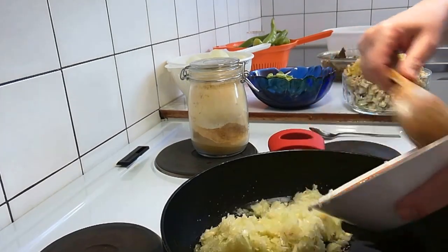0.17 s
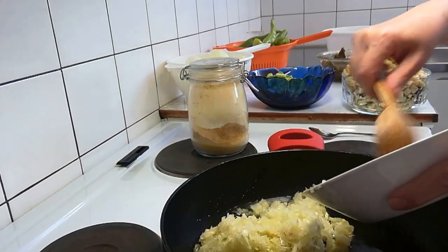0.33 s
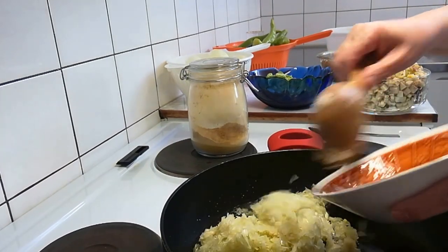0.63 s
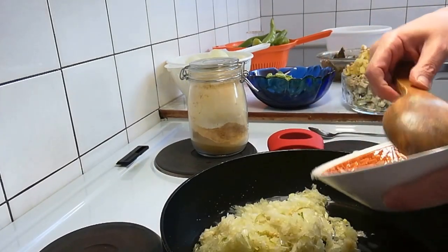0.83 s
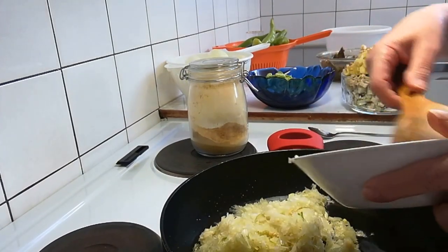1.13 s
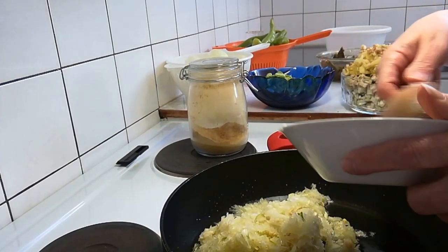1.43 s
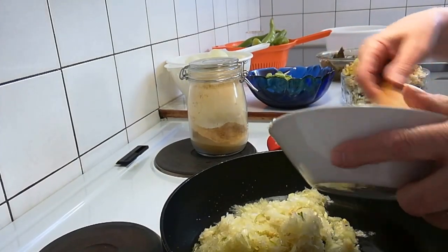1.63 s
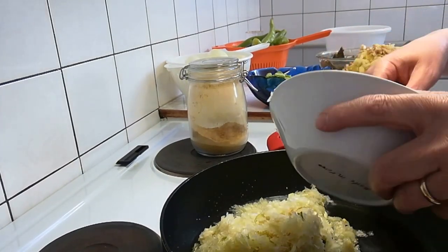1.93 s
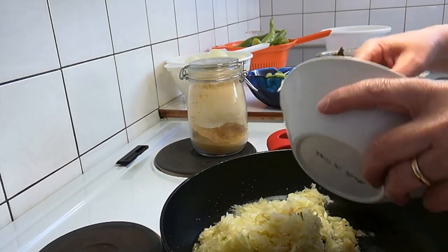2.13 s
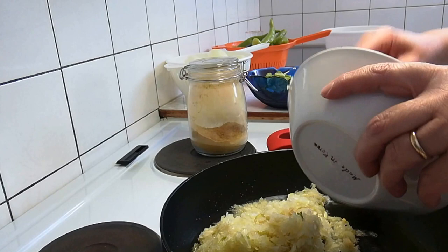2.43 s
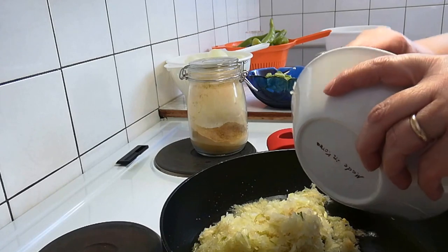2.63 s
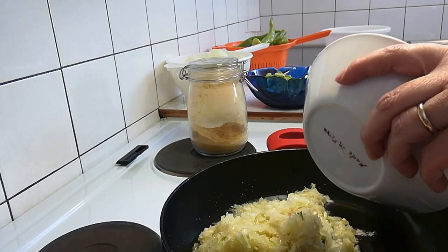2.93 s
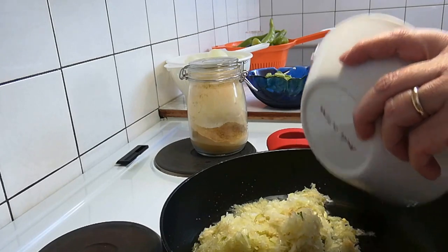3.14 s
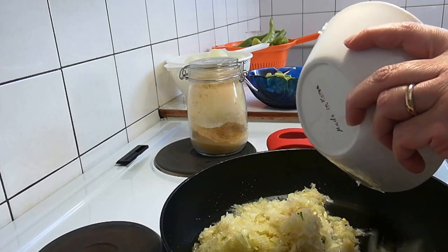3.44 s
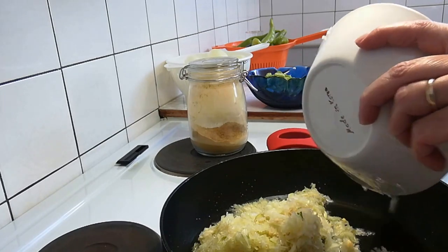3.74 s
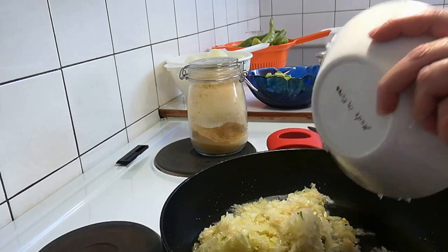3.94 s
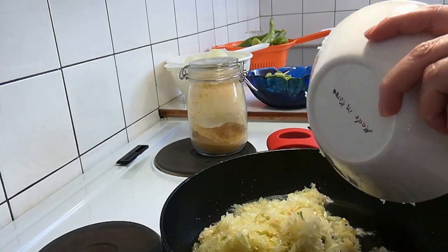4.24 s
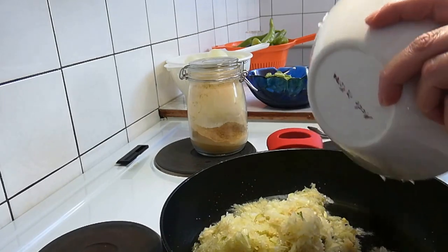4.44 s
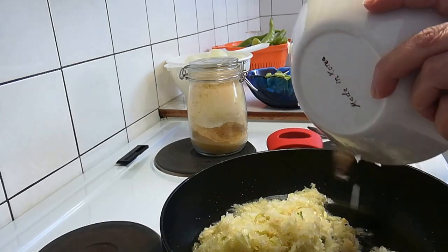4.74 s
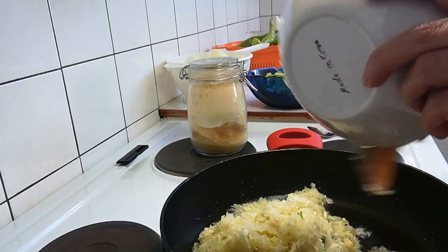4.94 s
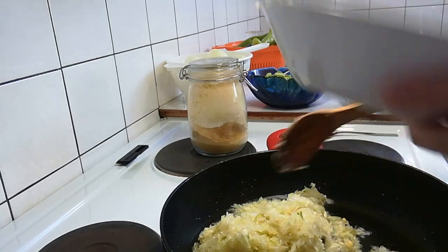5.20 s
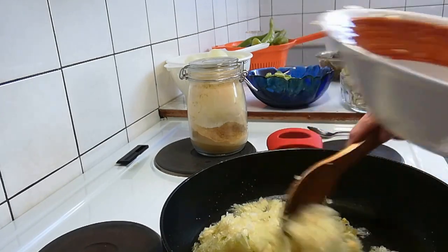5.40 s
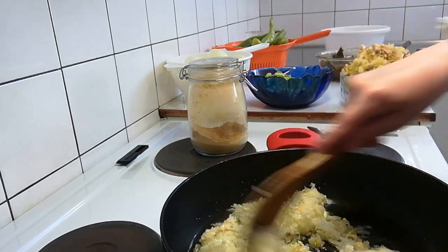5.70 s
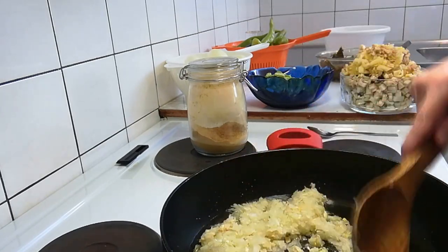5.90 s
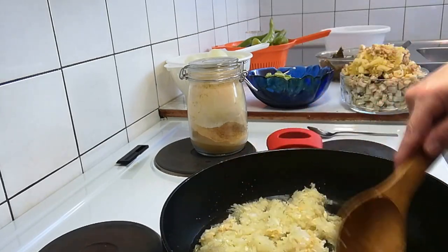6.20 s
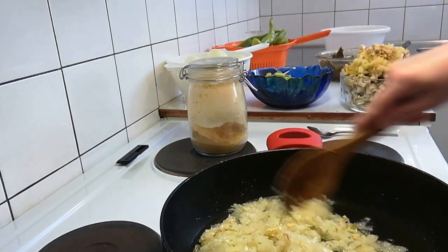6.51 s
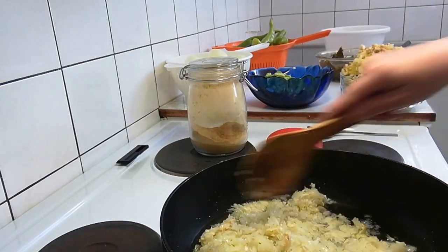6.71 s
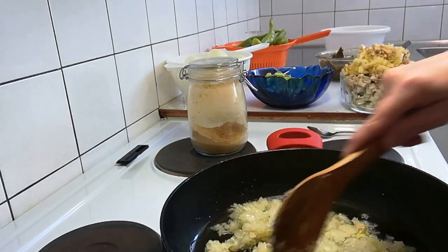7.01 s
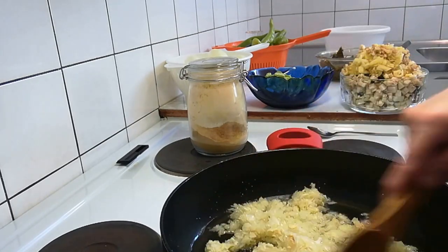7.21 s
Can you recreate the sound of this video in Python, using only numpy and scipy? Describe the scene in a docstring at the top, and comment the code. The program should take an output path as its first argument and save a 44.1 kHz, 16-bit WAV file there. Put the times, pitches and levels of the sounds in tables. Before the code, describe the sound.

Close frying sizzle in a tiled kitchen, irregular wooden spoon knocks on a ceramic bowl, small wet smacks, then rasping stirs in the pan.

```python
"""Chopped onion and garlic sizzle in hot oil in a tiled kitchen: dense random micro-pops over steam noise.
First a wooden spoon knocks and scrapes the last of them out of a ceramic bowl: filtered ringing modes,
noise cracks and jerky rubbing, with a few wet smacks of noise and landings that lift the frying.
From 5.3 s the spoon spreads the heap: rasping strokes, two spits, and a sizzle that flares as onion turns.
Throughout, a drone of shaped noise with a faint steady hum lies low in the background."""
import sys
import numpy as np
from scipy import signal
from scipy.fft import rfft, irfft, next_fast_len
from scipy.io import wavfile
from scipy.ndimage import map_coordinates

SR = 44100
rng = np.random.default_rng(int(sys.argv[2]) if len(sys.argv) > 2 else 0)


def inscribe(sig):
    """Save sig as 16-bit PCM at rate SR to the path in sys.argv[1].

    A 1-D sig is mono; a 2-D sig holds one channel per row.
    Samples are clipped to [-1, 1] before scaling.
    """
    pcm = np.round(np.clip(np.atleast_2d(sig).T, -1, 1) * 32767)
    wavfile.write(sys.argv[1], SR, pcm.astype(np.int16))


N = 324443
TIME = np.arange(N) / SR
BLOW = np.arange(SR // 3) / SR  # time axis of one short sound, s

# Level columns set balances before flutter, room and final mix; side/dB is left over right.

# Tone of the resting heap: f/Hz, level/dB
RESTING_COLOUR = [(260, -54), (450, -24.5), (635, -22.5), (771, -12.5), (882, -7), (979, 0), (1420, -7.5),
                  (2190, -2), (2430, -5), (2960, -4), (3990, -10), (4430, -10), (5970, -17), (9340, -15),
                  (16000, -20)]
# Tone of the stirred heap: f/Hz, level/dB
STIRRED_COLOUR = [(260, -56), (450, -47), (563, -20), (782, -20), (856, -26), (979, -5), (1400, -12),
                  (1810, -3.5), (2700, -4), (2960, 2.5), (4170, -7.5), (5300, -8), (6150, -12),
                  (15100, -21.5), (16000, -18.5)]
# Onion and juice land in the oil and boil off: strongest t/s, bubbling level/dB, spray level/dB, fade/s
LANDINGS = [(.3, -53.5, -59.5, 0.32), (1.87, -68, -62.5, 0.34), (3.47, -66, -58.5, 3.0)]
# The spoon turns wet onion onto hot metal: strongest t/s, bubbling level/dB, spray level/dB, fade/s
TURNS = [(5.43, -47.5, -71, 0.054), (5.53, -49.5, -50, 1), (5.81, -54, -56, 0.085),
         (6.01, -47.5, -49.5, 0.1), (6.26, -50.5, -50.5, 0.092), (6.55, -59, -49.5, 0.35),
         (6.82, -62, -50.5, 0.83), (6.94, -50, -59, 0.24), (7.23, -53, -49.5, 0.21)]
LANDING_RISE_S, TURN_RISE_S = 0.21, 0.067
# steady frying of the untouched heap, and what spreading adds: each (bubbling dB, fine spray dB)
RESTING_DB, SPREAD_DB = (-55.5, -60.5), (-58.5, -53.5)
SPREAD_START_S, SPREAD_RISE_S = 5.3, 0.13


def pan():
    """The resting heap fries gently; stirring brings wet onion onto fresh hot oil."""
    resting_levels = boiling(RESTING_DB, LANDINGS, LANDING_RISE_S)
    resting = frying(resting_levels, RESTING_COLOUR, per_s=3000, spread_db=2.5, steam_db=1.0)
    stirred_levels = boiling(SPREAD_DB, TURNS, TURN_RISE_S)
    stirred = frying(stirred_levels, STIRRED_COLOUR, per_s=3500, spread_db=3.0, steam_db=-0.5,
                     crackle_db=-13.5, flutter_db=0.6, clump_db=1.5)
    fade_in = np.clip((TIME - SPREAD_START_S) / SPREAD_RISE_S, 0, 1)
    return resting + stirred * fade_in


def boiling(steady_db, flares, rise_s):
    """Levels of bubbling and spray in dB: steady frying, plus fresh water that boils off after each flare."""
    power = gain_of(steady_db)[:, None] ** 2
    for s, bubbling_db, spray_db, fade_s in flares:
        flare = gain_of([[bubbling_db], [spray_db]]) * swell(s, rise_s, fade_s)
        power = power + flare ** 2
    return 10 * np.log10(power)


# Resonances of the hollow pan: f/Hz, width/Hz, level/dB
PAN_HOLLOW = [(789, 57, 7), (990, 150, 1.5), (1340, 190, -2), (1808, 31, 7), (2246, 68, 3.5), (2526, 57, 6),
              (2920, 24, 9)]
# Stereo lean of the oil: f/Hz, side/dB
OIL_SIDE = [(500, -4), (800, -4.5), (1000, -8.5), (1350, 1.5), (1900, -6.5), (3000, -7.5), (4200, -0.5),
            (5300, 3.5), (6300, 11), (8500, 7.5), (12000, 3.5), (15500, 13.5)]


def frying(levels, colour, per_s, spread_db, steam_db, split_hz=4500, crackle_db=-14,
           flutter_db=0.82, flutter_hz=16, clump_db=1.6):
    """Water bursts out of the onion as countless micro-pops over a hiss of steam, coloured by the pan."""
    bubbling_db, spray_db = levels
    bursts = pops(per_s, spread_db)
    bursts += gain_of(steam_db) * rng.standard_normal((2, N))
    bursts += gain_of(crackle_db) * pops(70, 0.86)  # now and then a larger bubble

    def pan_tone(hz):
        return gain_of(read(colour, hz) + bumps(PAN_HOLLOW, hz)) * sides(read(OIL_SIDE, hz))

    oil = shaped(clumped(bursts, clump_db), pan_tone)
    bubbling = shaped(oil, lambda hz: 1 / (1 + (hz / split_hz) ** 8))
    spray = oil - bubbling
    flutter = flutter_db * wander(flutter_hz)  # bubbles come in clumps
    bubbling = bubbling / bubbling.mean(0).std() * gain_of(bubbling_db + flutter)
    spray = spray / spray.mean(0).std() * gain_of(spray_db + flutter / 2)
    return bubbling + spray


def clumped(x, db, step_s=0.032, octaves=.3):
    """Bubbles of like size burst in clumps: each band swells and sinks on its own."""
    hz, t, z = signal.stft(x, SR, nperseg=512)
    places = np.meshgrid(np.log2(hz + 1) / octaves, t / step_s, indexing="ij")
    patches = map_coordinates(rng.standard_normal((64, 512)), places, order=1, mode="wrap")
    return signal.istft(z * gain_of(db * patches), SR, nperseg=512)[1][:, :N]


# Spoon against bowl: t/s, thud level/dB, spoon level/dB, bowl level/dB, crack level/dB,
# contact hardness f/Hz, side/dB, gripped spoon f/Hz, pitch favoured by the struck spot f/Hz, its lift/dB
KNOCKS = [(0.1378, -56.5, -39, -45, -46.5, 8280, 10, 710, 720, 0),
          (0.139, -54, -33.5, -42, -49, 8400, -5.5, 717, 2130, 11),
          (0.1901, -40.5, -37.5, -41, -48, 2100, -3.5, 733, 1160, 12),
          (0.3098, -57, -35, -42, -43, 4400, -4.5, 719, 2640, 7),
          (0.382, -65, -50, -62, -65, 1000, -1, 756, 760, 4),
          (1.2974, -47.5, -43.5, -53, -62, 965, -6, 807, 1570, 11),
          (1.681, -50, -44.5, -66, -55, 1200, -8.5, 722, 680, 9),
          (1.882, -53, -60, -52, -50, 1770, -6.5, 740, 750, -1),
          (2.116, -47.5, -58, -47, -60, 1250, -3, 730, 358, 14),
          (2.252, -39.5, -37, -25, -40, 2660, -2, 746, 1900, 7),
          (2.4671, -46, -51, -51, -43.5, 2920, -4.5, 746, 890, 2),
          (2.523, -44, -54, -42.5, -50, 1450, -7, 728, 1030, -4),
          (2.988, -54.5, -66, -70, -59, 523, -5, 715, 390, -2),
          (3.1143, -45, -46.5, -29, -28.5, 2710, 0.5, 714, 2320, 10),
          (3.1215, -56, -59, -30, -32, 2900, -3, 750, 2420, 13.5),
          (3.116, -71, -65, -22.5, -32, 4020, -13, 735, 1900, 13.5),
          (3.5162, -46, -60, -43.5, -53, 1290, -2.5, 720, 950, 1),
          (3.816, -46, -35.5, -36.5, -47, 5500, 0.5, 754, 2580, 14),
          (3.8189, -44, -39, -33.5, -38, 2700, -17, 752, 2620, 11),
          (3.8219, -52, -41.5, -45, -51, 6400, 0.5, 695, 1100, 5),
          (3.894, -48, -52, -48, -48, 3220, -8, 755, 950, 12),
          (3.903, -51, -52, -47, -47, 2800, -3, 755, 1100, 3),
          (3.911, -47, -48, -36.5, -46, 3080, -14, 736, 1620, 14),
          (4.2328, -41.5, -46, -39.5, -46, 2580, -4, 708, 1480, 4),
          (4.244, -47, -51, -41, -55, 2400, -16, 700, 2090, 25),
          (4.3172, -54, -45, -43, -49, 2800, -4, 714, 2680, 14),
          (4.3546, -50.5, -55, -34, -37, 3100, -4.5, 736, 2580, 6),
          (4.378, -62, -52, -49, -46, 3600, -8, 725, 3750, 2),
          (4.429, -51, -52, -41, -48, 2700, -7, 740, 1940, 25),
          (4.7811, -41, -68, -32.5, -60, 1470, -5, 720, 1430, 14.5)]
# Thud modes: f/Hz, level/dB, t60/s, side/dB
THUD = [(339, -8.5, 0.16, -0.5), (469, -9, 0.044, -12), (524, 2, 0.023, -13), (651, 13.5, 0.02, 6.5),
        (786, 9.5, 0.03, -0.5), (946, 3, 0.079, -4)]
# Wooden spoon modes, before the grip retunes them: f/Hz, level/dB, t60/s, side/dB
SPOON = [(716, 8, 0.072, 7.5), (975, 5, 0.055, 2), (1166, 8, 0.056, 0), (1288, 2.5, 0.055, -3),
         (2130, -3, 0.029, -4), (3600, -11, 0.01, -4), (3930, 13.5, 0.027, 1), (4170, 10.5, 0.02, -10),
         (4700, 11.5, 0.012, -7), (5400, 8, 0.015, 6), (5980, 7.5, 0.019, 5)]
# Ceramic bowl modes: f/Hz, level/dB, t60/s, side/dB
BOWL = [(1039, 15.5, 0.028, -7.5), (1190, -4, 0.079, -4), (1394, -1.5, 0.059, 7), (1542, -0.5, 0.068, 7.5),
        (1622, -1.5, 0.058, -1), (1755, -6, 0.092, -13), (1849, 1, 0.06, 1), (1910, -2, 0.053, 6),
        (2018, -1, 0.064, -18), (2220, -5, 0.029, -7), (2360, -3.5, 0.035, 22), (2490, -12, 0.036, 6),
        (2638, 7, 0.024, -7), (2840, -6, 0.043, 8), (2980, -6.5, 0.029, -3), (3663, 11, 0.066, 10),
        (5380, 13, 0.041, -3), (5680, 9.5, 0.042, -8)]
# Tone of the crack at contact: f/Hz, level/dB
CRACK = [(150, -43), (500, -10.5), (900, -6.5), (1500, 5.5), (2400, 6), (3600, 3.5), (4600, -23),
         (6000, -7), (10000, 3), (16000, -23)]


def knocks(crack_t60=0.032, crack_reach=1.88, rim_ratio=2.53, spoon_low_hz=620):
    """Thud and crack while spoon and bowl ring; each blow lands on another spot, dulled by onion between."""
    thud, bowl = ring(THUD), ring(BOWL)
    thud = thud * (1 - np.exp(-BLOW / 0.0023))  # a padded push builds up gently
    thud = edge(thud, 278, "high", order=4)  # a small bowl radiates no bass
    mix = np.zeros((2, N))
    for (s, thud_db, spoon_db, bowl_db, crack_db, hardness_hz, side_db,
         spoon_hz, spot_hz, spot_db) in KNOCKS:
        spoon = ring(SPOON, spoon_hz / SPOON[0][0])  # the grip retunes the spoon
        spoon = edge(spoon, spoon_low_hz, "high", order=4)
        noise = rng.standard_normal((2, len(BLOW)))
        crack = shaped(noise, lambda hz: gain_of(read(CRACK, hz)))
        crack = crack * gain_of(-60 * BLOW / crack_t60)
        crack = edge(crack, hardness_hz * crack_reach, "low", order=3)
        blow = gain_of(crack_db) * burst(crack)
        # hard taps land on the rim and miss the low modes
        rim = edge(bowl, hardness_hz / rim_ratio, "high", order=3)
        for db, part in (thud_db, thud), (spoon_db, spoon), (bowl_db, rim):
            contact = edge(part, hardness_hz, "low", order=5)  # each part rings through the contact
            blow = blow + gain_of(db) * burst(favoured(contact, spot_hz, spot_db))
        add(mix, s, sides(side_db) * skidding(blow))
    return mix


def ring(modes, stretch=1, lag=0.00014):
    """Dying modes; they reach the right microphone a little later."""
    t = np.maximum(BLOW - np.array([[0], [lag]]), 0)
    total = 0
    for hz, db, t60, side in modes:
        tone = np.sin(2 * np.pi * hz * stretch * t)
        total = total + sides(side) * gain_of(db - 60 * t / t60) * tone
    return total


def favoured(x, hz, db, sharpness=5):
    """The point of contact weights the modes near one pitch differently from the rest."""
    return x + (gain_of(db) - 1) * signal.lfilter(*signal.iirpeak(hz, sharpness, fs=SR), x)


def skidding(x, skid_db=-10, skid_s=0.0036, per_s=2000):
    """The wood skids on after it lands: a few smaller contacts follow the first."""
    hits = rng.standard_normal(len(BLOW)) * (rng.random(len(BLOW)) < per_s / SR)
    contacts = hits * np.exp(-BLOW / skid_s)
    contacts = gain_of(skid_db) * contacts / (np.linalg.norm(contacts) + 1e-12)
    return x + signal.fftconvolve(x, contacts[None], axes=1)[:, :x.shape[1]]


# The spoon drags inside the bowl: t/s of hardest pressure, level/dB, fade/s
SCRAPES = [(.17, -56, 0.061), (.41, -51.5, 0.033), (1.87, -59, 0.25), (2.53, -55.5, 0.045),
           (3.85, -50.5, 0.054), (3.92, -51.5, 0.041), (4.27, -58, 0.056), (4.37, -45.5, 0.07),
           (4.88, -62, 0.068)]
SCRAPE_RISE_S = 0.051
# Tone of wood rubbing on glaze: f/Hz, level/dB
RUB = [(150, -52), (400, -48), (750, -16), (1100, 4), (1500, 2.5), (2600, -17), (4500, -6), (7000, -17),
       (16000, -36)]


def scraping(bowl_db=-7, spoon_db=-5, ring_top_hz=3800):
    """Wood slips over the glaze in small jerks that excite the lower modes of spoon and bowl."""
    slips = pops(700, 4.4)
    rub = evened(shaped(slips, lambda hz: gain_of(read(RUB, hz))))
    for db, modes in (bowl_db, BOWL), (spoon_db, SPOON):
        body = edge(ring(modes), ring_top_hz, "low", order=3)
        rub = rub + gain_of(db) * evened(signal.oaconvolve(slips, body, axes=1)[:, :N])
    pressure = sum(gain_of(db) * swell(s, SCRAPE_RISE_S, fade_s) for s, db, fade_s in SCRAPES)
    return evened(rub) * pressure


# Wet onion peels off the bowl: t/s, level/dB, centre f/Hz, t60/s, width/octaves
SMACKS = [(1.788, -47.5, 12100, 0.011, 1), (1.872, -55, 7800, 0.083, 0.31), (2.838, -48, 9200, 0.013, 0.7),
          (2.841, -52, 3000, 0.075, 0.52), (2.897, -52, 7800, 0.03, 0.25), (2.977, -52, 15100, .05, .37),
          (3.016, -54, 15000, .05, .37), (3.408, -47, 14000, 0.13, .37), (3.452, -53, 8100, 0.11, 0.18)]


def smacks():
    """Wet onion peels away and its liquid film snaps."""
    return splats(SMACKS)


# The spoon pushes onion over the pan floor: middle t/s, level/dB, centre f/Hz, half length/s
STROKES = [(5.577, -46, 1930, 0.096), (5.54, -54.5, 980, 0.077), (5.694, -48, 990, 0.021),
           (5.997, -63, 3100, .05), (6.252, -52.5, 2650, 0.056), (6.26, -52, 990, 0.034),
           (6.452, -58, 990, 0.055), (6.78, -53, 2120, 0.084), (7.12, -53, 1740, 0.06),
           (7.217, -47, 2250, 0.05), (7.215, -52, 3200, 0.041), (7.275, -54, 904, 0.11)]


def stirring(octaves=0.18):
    """Each push of the spoon rasps briefly in the hollow of the pan."""
    mix, slips = np.zeros((2, N)), pops(700, 3.0)
    for s, db, centre_hz, half_s in STROKES:
        rasp = evened(shaped(slips, lambda hz: around(hz, centre_hz, octaves)))
        mix += gain_of(db) * rasp * np.exp(-((TIME - s) / half_s) ** 2)
    return sides(-10.5) * mix


# Fat bubbles burst in the stirred oil: t/s, level/dB, centre f/Hz, t60/s, width/octaves
SPITS = [(5.865, -44, 2920, 0.043, 0.057), (6.254, -67, 1520, 0.067, .15)]


def spits():
    """Fat bubbles burst as narrow, pitched sprays of noise."""
    return splats(SPITS)


def splats(films):
    """Places every snapping film of a table in time."""
    mix = np.zeros((2, N))
    for s, *film in films:
        add(mix, s, splat(*film))
    return mix


def splat(db, centre_hz, t60, octaves):
    """A liquid film snaps: a short spray of noise around one pitch."""
    noise = rng.standard_normal((2, len(BLOW)))
    noise = shaped(noise, lambda hz: around(hz, centre_hz, octaves))
    return gain_of(db) * burst(noise * gain_of(-60 * BLOW / t60))


# Stereo lean of the spoon work: f/Hz, side/dB
SPOON_SIDE = [(300, 5), (4000, 0.5), (5200, 6), (6500, 19), (9000, 5.5), (16000, 6)]


def spoon_work():
    """All that the spoon sets off, heard in the room: knocks, scraping, smacks, stirring and spits."""
    mix = knocks() + scraping() + smacks() + stirring() + spits()
    return shaped(kitchen(mix), lambda hz: sides(read(SPOON_SIDE, hz)))


def kitchen(x, tail_db=-6, build=0.004):
    """The tiled corner answers at once; then a short diffuse tail."""
    # t/s, level/dB, channel (0 left, 1 right)
    echoes = [(.0046, -8.5, 0), (.0072, -15, 1), (.0112, -20, 1), (.0185, -11, 0), (.0188, -16, 1)]
    # f/Hz, t60/s
    decay = [(250, 0.47), (1000, 0.4), (2000, 0.43), (4000, 0.37), (8000, 0.47), (16000, 0.33)]
    hz, t, z = signal.stft(rng.standard_normal((2, len(BLOW))), SR, nperseg=256)
    fading = z * gain_of(-60 * t / read(decay, hz)[:, None])
    tail = signal.istft(fading, SR, nperseg=256)[1][:, :len(BLOW)]
    tail = tail * (1 - np.exp(-BLOW / build))
    response = gain_of(tail_db) * tail / np.linalg.norm(tail[0])
    for s, db, channel in echoes:
        response[channel, round(s * SR)] += gain_of(db)
    return x + signal.oaconvolve(x, response, axes=1)[:, :N]


# Tone of the drone: f/Hz, level/dB
DRONE = [(15, -37), (30, -12.5), (62, -19), (90, -5), (135, -3), (175, -2), (205, -12.5), (270, -19.5),
         (380, -16.5), (480, -29), (620, -28.5), (900, -59)]
# Humming resonances, negative levels being dips: f/Hz, width/Hz, level/dB
DRONE_PEAKS = [(113, 6.5, -10.5), (137.1, 3.8, 10.5), (325, 4, -7)]
# Stereo width of the drone: f/Hz, side against mid level/dB
DRONE_SIDE = [(40, -31), (110, -22), (200, -13.5), (380, -1.5), (700, 3)]
# The low rumble swells briefly: t/s, level/dB, fade/s
RUMBLES = [(.1, -56.5, 0.45), (.6, -59, 0.074), (1.3, -61, 0.21), (1.48, -55.5, 0.055), (2.54, -52, 0.047),
           (3.14, -56, 0.09), (3.98, -56, 0.12), (5.92, -59, 0.16)]
RUMBLE_RISE_S = 0.067
DRONE_DB, DRONE_WANDER_DB, DRONE_WANDER_HZ = -61.5, 1.85, 2.9


def drone():
    """Low, nearly mono shaped noise with narrow humming resonances; it wavers and now and then swells."""
    shared, apart = rng.standard_normal((2, N))
    side = shaped(apart, lambda hz: gain_of(read(DRONE_SIDE, hz)))
    air = shared + np.array([[1], [-1]]) * side
    rumble = shaped(air, lambda hz: gain_of(read(DRONE, hz) + bumps(DRONE_PEAKS, hz)))
    power = gain_of(DRONE_DB + DRONE_WANDER_DB * wander(DRONE_WANDER_HZ)) ** 2
    for s, db, fade_s in RUMBLES:
        power = power + (gain_of(db) * swell(s, RUMBLE_RISE_S, fade_s)) ** 2
    return evened(rumble) * np.sqrt(power)


def hum(hz=49, peak_db=-77):
    """A faint steady sine under the drone."""
    return gain_of(peak_db) * np.sin(2 * np.pi * hz * TIME)


def pops(per_s, spread_db):
    """Random tiny impulses, a few of them much larger than the rest."""
    size = gain_of(spread_db * np.minimum(rng.exponential(1, (2, N)), 6))
    sign = rng.choice([-1, 1], (2, N))
    return evened(size * sign * (rng.random((2, N)) < per_s / SR))


def swell(peak_s, rise_s, fade_s):
    """An envelope that rises smoothly to 1 and then dies away; rise and fade reach 1/e."""
    t = TIME - peak_s
    return np.exp(-(np.minimum(t, 0) / rise_s) ** 2 - np.maximum(t, 0) / fade_s)


def wander(rate_hz):
    """Slow random drift of rms 1."""
    return evened(shaped(rng.standard_normal(N), lambda hz: 1 / (1 + (hz / rate_hz) ** 2)))


def gain_of(db):
    """Decibels to amplitude."""
    return 10 ** (np.asarray(db) / 20)


def evened(x):
    """Scales to rms 1."""
    return x / np.sqrt(np.mean(x ** 2) + 1e-20)


def burst(x):
    """Scales a short sound to the energy of 25 ms at rms 1."""
    return evened(x) * np.sqrt(.025 * SR / x.shape[-1])


def read(points, hz):
    """A curve joined by straight lines over log frequency."""
    f, value = np.transpose(points)
    return np.interp(np.log(hz + 1), np.log(f + 1), value)


def bumps(peaks, hz):
    """Resonance peaks in dB."""
    return sum(db / (1 + (2 * (hz - f) / width) ** 2) for f, width, db in peaks)


def around(hz, centre_hz, octaves):
    """A hump of gain around one pitch."""
    return 1 / (1 + (np.log2((hz + 1) / centre_hz) / octaves) ** 2)


def sides(db):
    """Left and right gains of equal total power."""
    pair = gain_of(np.array([[.5], [-.5]]) * db)
    return pair / np.sqrt(np.mean(pair ** 2, 0))


def shaped(x, gain):
    """Filters by a gain that is a function of frequency."""
    size = next_fast_len(x.shape[-1] + 2048)
    spectrum = rfft(x, size) * gain(np.fft.rfftfreq(size, 1 / SR))
    return irfft(spectrum, size)[..., :x.shape[-1]]


def edge(x, hz, kind, order):
    """A low-pass or a high-pass."""
    return signal.sosfilt(signal.butter(order, min(hz, .45 * SR), kind, fs=SR, output="sos"), x)


def add(mix, s, sound):
    """Mixes a stereo sound in at time s."""
    part = mix[:, round(s * SR):][:, :sound.shape[1]]
    part += sound[:, :part.shape[1]]


def scene():
    """Pan, spoon, and the background drone with its faint steady hum."""
    return pan() + gain_of(-1.5) * spoon_work() + drone() + hum()


def record(dry, edge_hz=15950):
    """The recorder's band limit: a steep low-pass."""
    lowpass = signal.firwin(511, edge_hz, window=("kaiser", 9), fs=SR)
    return signal.oaconvolve(dry, lowpass[None], "same")


dry = scene()
out = record(dry)
inscribe(out)
```